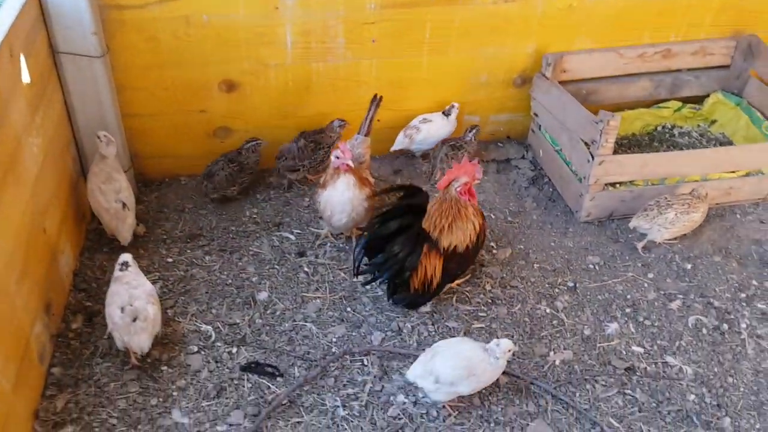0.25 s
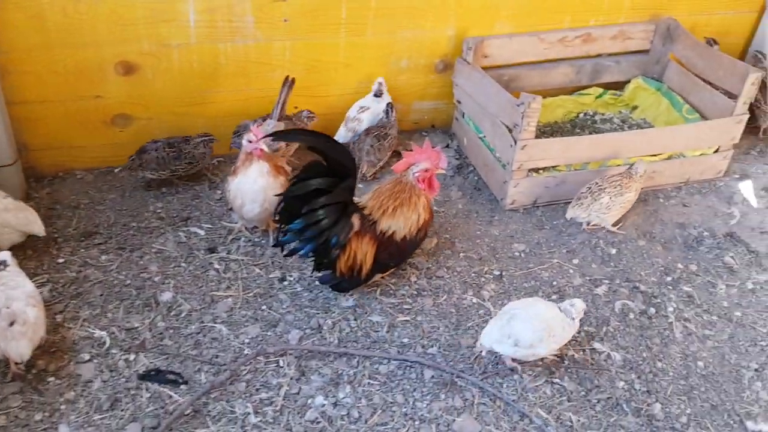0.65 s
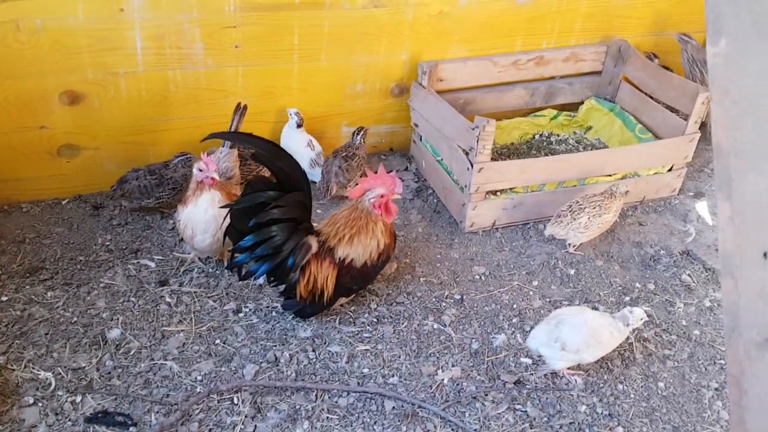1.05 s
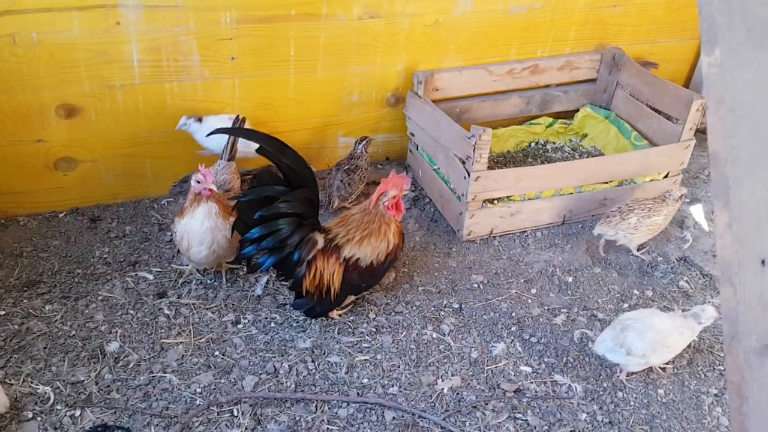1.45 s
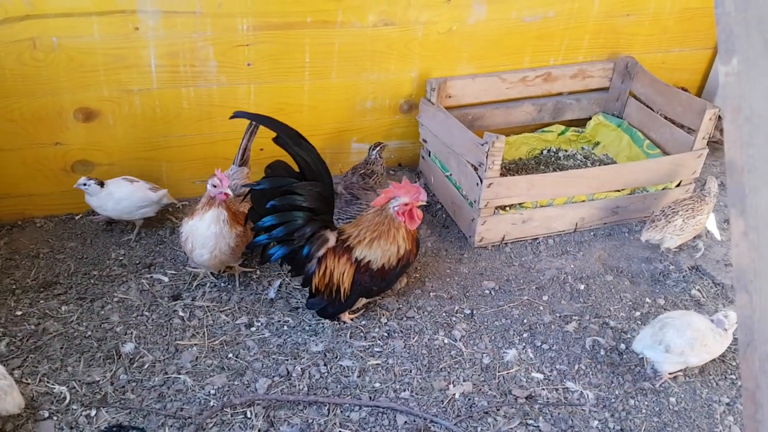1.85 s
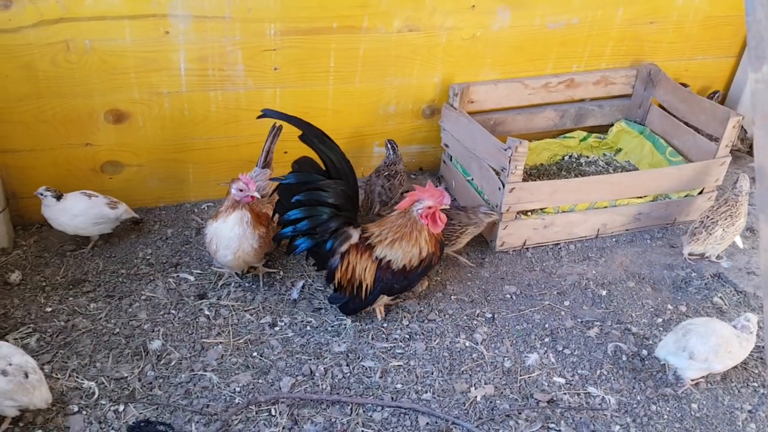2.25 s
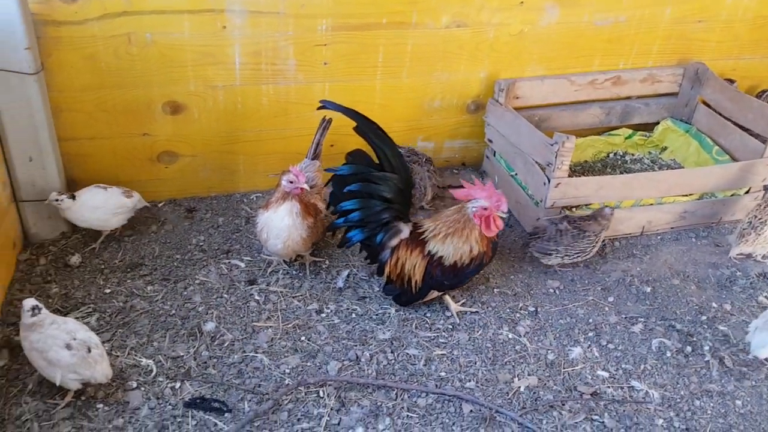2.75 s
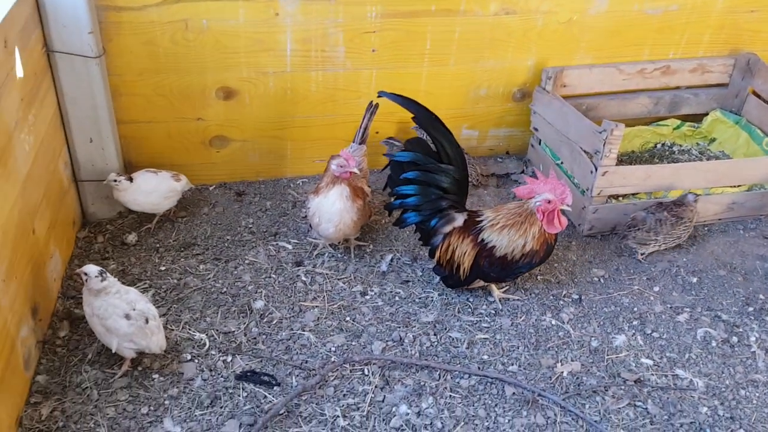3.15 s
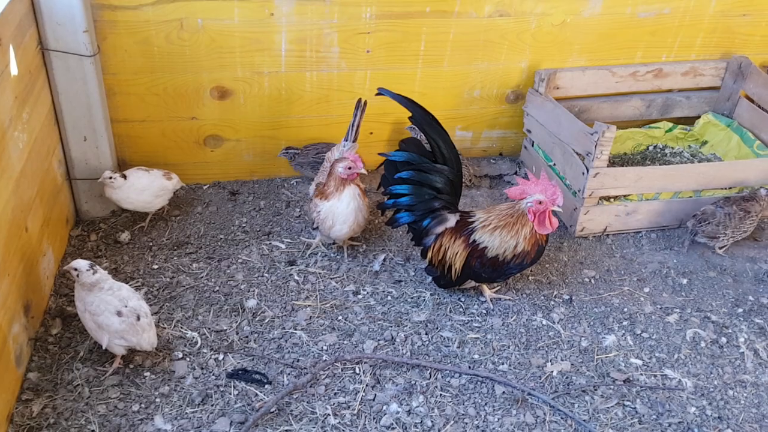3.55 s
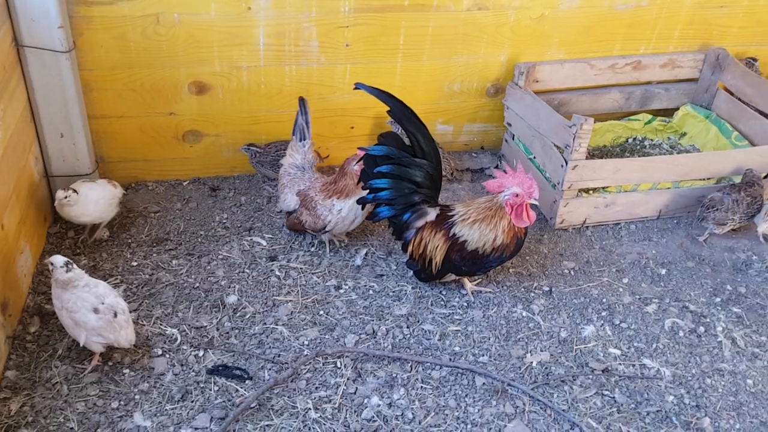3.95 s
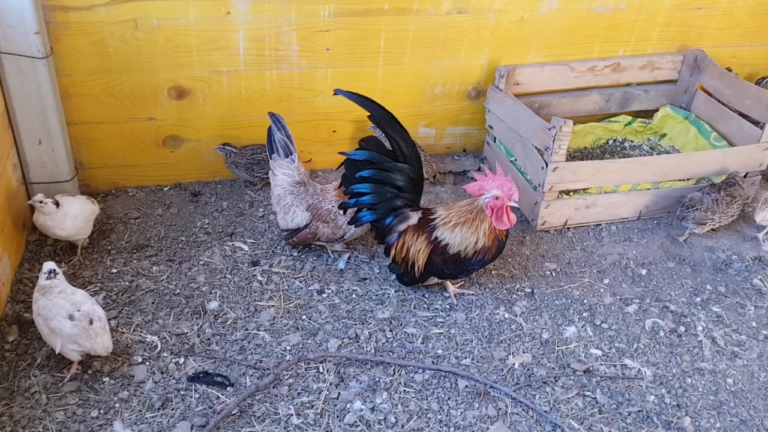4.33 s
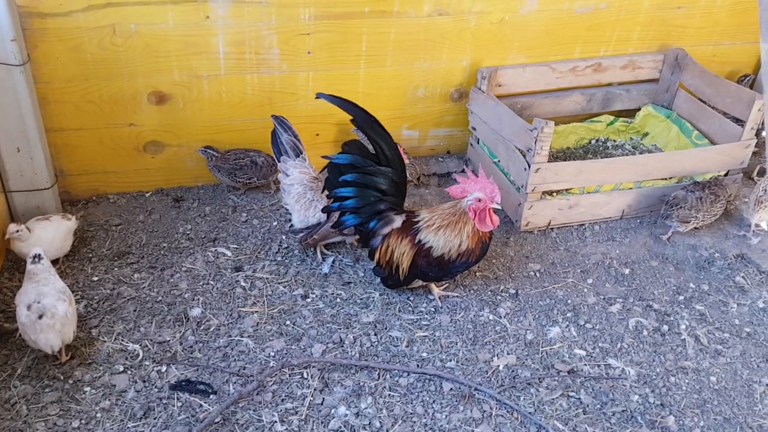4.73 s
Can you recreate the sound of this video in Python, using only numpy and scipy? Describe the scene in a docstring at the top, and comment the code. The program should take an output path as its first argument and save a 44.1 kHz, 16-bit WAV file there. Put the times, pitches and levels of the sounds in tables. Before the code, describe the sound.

A quiet outdoor hush with a very faint distant drone surrounds a small plank-walled aviary. From 0 to 1.1 s thin, fluttering, gliding chirps come from further off, while beaks and claws tick on gritty litter, most sharply near 0.9 s. At about 1.25 s wings swish in a quick flurry; until roughly 2.0 s feet scrape dully and bodies knock on wooden boards, with litter rustling and wire mesh shivering. Another brief flutter and bump comes at 2.3 s. A hen gives a short rough cluck at 2.5 s and a much fainter one at 2.8 s. Sparse ticks and weak chirps follow from 2.9 s. At 4.17 s a quail utters a short low note that cracks midway, then from 4.39 to 4.87 s a loud, harsh crow swells, trilling about twenty times a second, and stops abruptly with a short woody reverberation. Close stereo pickup.

```python
"""Thin chirps come from further off over an outdoor hush, while beaks, claws and feet tick on the litter.
From about one second birds flutter, bump the boards and scrape; then a hen clucks twice.
Near the end a quail gives a short note and then a harsh trilled crow, in a plank-walled aviary with wire mesh.
Its voice is rough pulses driving resonances and a swooping whistle; the small sounds are shaped noise and
fading tones. A close pair of microphones hears the crow with its reflections from ground and planks."""
import sys
import numpy as np
from scipy import signal
from scipy.fft import rfft, irfft
from scipy.io import wavfile
from scipy.ndimage import uniform_filter1d

SR = 44100
rng = np.random.default_rng(int(sys.argv[2]) if len(sys.argv) > 2 else 0)


def transcribe(u):
    """Save the signal u as a 16-bit wav file named by the first command-line argument.

    u: samples, shape (n,) or (channels, n), limited to [-1, 1]; the rate is SR.
    q: integer samples, one column per channel.
    """
    v = np.clip(np.atleast_2d(u).T, -1, 1)
    q = np.round(v * 32767).astype(np.int16)
    wavfile.write(sys.argv[1], SR, q)


N = 219838
TIME, BINS = np.arange(N) / SR, np.fft.rfftfreq(N, 1 / SR)  # seconds, Hz

# How alike left and right are for sounds spread over the ground.
# Each row: frequency in Hz, likeness from 0 to 1.
GROUND_LIKENESS = [(100, 0.97), (500, 0.86), (1000, 0), (2000, 0), (6000, 0), (15000, 0.3)]
# The crowing voice swoops up and back about 20 times a second.
# Each row: start in seconds, time at the crest in seconds, strength of the kick going up in dB.
VOICE_SWOOPS = [(4.417, 0.015, 12.5), (4.465, 0.019, 7), (4.517, .021, 6), (4.568, 0.0188, 9),
                (4.618, 0.01985, 4), (4.6683, 0.0174, 6), (4.715, .019, 9), (4.765, 0.0155, -7),
                (4.811, 0.012, -1), (4.848, .014, -5), (4.879, 0.012, 5)]
CROW_START_S, CROW_DB = 4.3853, -26.5  # the level is the full effort, before the voice is shaped


def amp(db):
    """Turns decibels into gain."""
    return 10 ** (np.asarray(db) / 20)


def unit(x):
    """Scales a sound to an average strength (rms) of 1."""
    return x / np.sqrt(np.mean(x ** 2) + 1e-20)


def read(points, hz):
    """Reads a table between its rows, on a log-frequency axis."""
    f, value = np.transpose(points)
    return np.interp(np.log(hz + 1), np.log(f + 1), value)


def colour(x, points):
    """Makes some frequencies louder than others, by a table of (Hz, dB)."""
    size = x.shape[-1]
    gain = amp(read(points, np.fft.rfftfreq(size, 1 / SR)))
    return irfft(rfft(x) * gain, size)


def add(mix, s, sound):
    """Mixes a sound in at time s, cutting it at the end of the mix."""
    part = mix[..., round(s * SR):][..., :sound.shape[-1]]
    part += sound[..., :part.shape[-1]]


def ramp(start, length):
    """Rises evenly from 0 to 1."""
    return np.clip((TIME - start) / length, 0, 1)


def wander(hz):
    """A random drift of rms 1 that changes at rates up to about the given one."""
    smooth = np.exp(-(BINS / hz) ** 2)
    return unit(irfft(rfft(rng.standard_normal(N)) * smooth, N))


def resonate(x, hz, width):
    """A steep two-stage resonance of gain 1 whose pitch can follow a curve."""
    turn = np.exp(2j * np.pi * np.cumsum(hz * np.ones(len(x))) / SR)
    r = np.exp(-np.pi * width / SR)
    # shift the pitch down to zero, smooth twice, and shift it back up
    smoothed = signal.lfilter([(1 - r) ** 2], [1, -2 * r, r * r], x / turn + 1e-18)
    return 2 * (turn * smoothed).real


def pair(x, likeness):
    """Blends two unrelated signals into a left and a right of given likeness."""
    a, b = rfft(x)
    same = np.clip(read(likeness, BINS), -1, 1)
    return irfft(np.array([a, same * a + np.sqrt(1 - same ** 2) * b]), N)


def steadied(x, size):
    """Holds a vibration at even strength over the given number of samples."""
    power = uniform_filter1d(uniform_filter1d(x ** 2, size), size)
    return x / np.sqrt(abs(power) + 1e-12)


def syrinx(hz, rough, jitter):
    """A bird's voice organ: uneven pulses mixed with puffs of air, one of each a cycle."""
    turns = np.cumsum(hz * (1 + jitter * rough * wander(300))) / SR
    pulses = np.diff(np.floor(turns), prepend=0)
    puffs = np.exp(-(turns % 1) / 0.23) * rng.standard_normal(N)
    rough = np.clip(rough, 0, 1)
    return (1 - rough) * unit(pulses - pulses.mean()) + rough * unit(puffs)


def air(drone_hz=1160, drone_width_hz=53, drone_db=-79, hush_db=-62.5):
    """A quiet, slightly uneven outdoor hush of coloured noise, with a faint far drone."""
    # Spectrum of the hush. Each row: frequency in Hz, relative level in dB.
    hush_colour = [(20, -33), (45, -10), (75, -5), (160, -11.5), (260, -8.5), (340, -3.5), (450, -2.5),
                   (700, -9.5), (1100, -12.5), (2400, -14.5), (7200, -27.5), (9200, -32.5), (11500, -27.5),
                   (15800, -25)]
    # How alike its left and right are. Each row: frequency in Hz, likeness from -1 to 1.
    hush_likeness = [(60, 0.74), (130, 0.88), (290, 0.71), (640, 0.27), (1400, -0.34), (3100, -0.069),
                     (15000, -0.0087)]
    noise = pair(rng.standard_normal((2, N)), hush_likeness)
    hush = unit(colour(noise, hush_colour)) * amp(hush_db + 1.8 * wander(0.98))
    hush = hush * amp([[-.7], [.7]])  # a little stronger on the right
    drone = unit(resonate(rng.standard_normal(N), drone_hz, drone_width_hz))
    return hush + amp(drone_db) * drone


def chirps(level_db=-3, waver=0.014, flutter_db=3, length_s=0.051, arch_octaves=.06):
    """Thin, fluttering whistles of small birds, each a slightly arched glide."""
    # Each row: start in seconds, level in dB before the shared trim and flutter,
    # pitch in Hz at the middle before the waver, glide in octaves.
    chirp_rows = [(.025, -69, 3900, -.3), (.062, -62.5, 2660, -0.54), (0.201, -67, 4350, 0.64),
                  (.325, -60.5, 2350, -0.84), (.353, -65, 4120, -.7), (0.426, -60.5, 3210, 0.48),
                  (0.48, -57, 2980, -0.67), (.515, -68, 2096, -.2), (.756, -59, 3500, 0.51),
                  (.78, -65, 3735, -0.42), (.81, -62, 3280, -0.73), (.903, -59, 4020, .35),
                  (1.036, -60, 4040, -0.9), (2.972, -65, 3180, -0.26), (3.058, -69, 3900, -0.99),
                  (3.142, -70, 3760, -0.81), (3.27, -66, 2760, -0.24)]
    out, shake = np.zeros(N), wander(370)
    u = np.linspace(-1, 1, int(length_s * SR))  # from start to end of a chirp
    for s, db, middle_hz, glide in chirp_rows:
        octaves = glide * u / 2 - arch_octaves * u ** 2
        hz = middle_hz * 2 ** octaves * (1 + waver * shake[int(s * SR):][:len(u)])
        whistle = np.sin(2 * np.pi * np.cumsum(hz) / SR)
        add(out, s, amp(db + level_db) * np.cos(np.pi * u / 2) * whistle)
    return out * amp(flutter_db * wander(150))


def grit(size, grain_db):
    """Two channels of tiny collisions of very uneven strength."""
    strength = np.minimum(rng.exponential(1, size // 8 + 1), 4).repeat(8)[:size]
    return unit(rng.standard_normal((2, size)) * amp(grain_db * strength))


def shower(rise_s, decay_s, low_db, treble_db, bright_db=0):
    """One short shower of grit and feather noise; a brighter one has less weight and more fizz."""
    # Basic colour of the shower. Each row: frequency in Hz, level in dB.
    scuff_colour = [(100, -40), (400, -3.5), (1300, 0.5), (4000, 2), (7000, -3), (9000, -5), (13000, 0),
                    (16000, -11)]
    t = np.arange(SR // 5) / SR
    stroke = (1 - np.exp(-t / rise_s)) * np.exp(-(t / decay_s) ** 0.88)
    tone = [(700, low_db - bright_db), (1700, 0.0091), (7000, 0), (10000, treble_db + bright_db)]
    noise = unit(colour(grit(len(t), grain_db=3.0), scuff_colour))
    return colour(noise, tone) * stroke / stroke.max()


def pattering(per_s=7, level_db=-61, spread_db=7.0):
    """Small feet keep ticking faintly on the grit, at random moments."""
    out = np.zeros((2, N))
    for s in TIME[rng.random(N) < per_s / SR]:
        tick = shower(rise_s=0.0007, decay_s=0.0032, low_db=-6, treble_db=-8)
        add(out, s, amp(level_db + spread_db * rng.uniform(-1, 1)) * tick)
    return pair(out, GROUND_LIKENESS)


def scratches(wing_db=-7.0, scrape_db=-8.5, peck_db=-4.5, clump_db=2.5):
    """Beaks and claws tick, wings swish brightly and feet scrape dully, all in uneven clumps."""
    # Beaks and claws on grit, strokes of wings, and feet scraping through the litter.
    # Each row: start in seconds, level in dB before the trim of its kind, brightness in dB.
    peck_rows = [(0.129, -55.5, -22.5), (0.3184, -49, -7), (.502, -54.5, -8), (0.6895, -47.5, 13),
                 (.7806, -43.5, 1), (0.9087, -50, 0), (0.9144, -35.5, 6.5), (1.0336, -45, 7.5),
                 (1.103, -46.5, -5), (1.205, -48.5, 12), (2.9293, -50, 12), (3.25, -54.5, 17),
                 (3.331, -51.5, -10), (3.503, -50, -14.5), (3.5666, -49.5, -9.5), (3.997, -58, 18),
                 (4.029, -53, 7)]
    wing_rows = [(1.254, -37.5, -1), (1.264, -32, 0), (1.282, -26, 0.5), (1.291, -32, -4), (1.311, -27, 2),
                 (1.3172, -34.5, -2), (1.422, -36, 2), (1.433, -31.5, -6), (2.31, -37, 2.5)]
    scrape_rows = [(1.312, -31.5, -2), (1.367, -36, -4.5), (1.399, -37.5, 0.5), (1.477, -37, 4),
                   (1.506, -43, 8), (1.6074, -38, 5), (1.6713, -47, -1), (1.841, -42, 3), (1.917, -36.5, 2),
                   (2.33, -44, -3.5)]
    out = np.zeros((2, N))
    for s, db, bright in peck_rows:
        tick = shower(rise_s=0.00045, decay_s=0.0021, low_db=1, treble_db=-12.5, bright_db=bright)
        add(out, s, amp(db + peck_db) * tick)
    for s, db, bright in wing_rows:
        swish = shower(rise_s=0.0036, decay_s=0.009, low_db=-8.5, treble_db=-9.5, bright_db=bright)
        add(out, s, amp(db + wing_db) * swish)
    for s, db, bright in scrape_rows:
        scrape = shower(rise_s=0.0017, decay_s=.013, low_db=14.5, treble_db=-20, bright_db=bright)
        add(out, s, amp(db + scrape_db) * scrape)
    return pair(out, GROUND_LIKENESS) * amp(clump_db * wander(136))


def bumps(knock_db=-9, knock_s=0.0086, soft_cycles=0.37):
    """Each blow gives a dull knock at the spot that is struck, softer when low, and the planks ring on."""
    # Feet and bodies on wood.
    # Each row: start in seconds, level in dB, pitch in Hz, time to fade by 60 dB in seconds.
    bump_rows = [(1.104, -52, 369, .09), (1.309, -29.5, 720, 0.033), (1.3942, -27.5, 738, 0.036),
                 (1.452, -25.5, 380, 0.035), (1.600, -27, 417, 0.031), (1.617, -34.5, 186, 0.18),
                 (1.845, -37, 214, 0.18), (1.858, -46, 603, 0.16), (1.921, -38, 920, 0.029),
                 (2.029, -37.5, 480, 0.098), (2.348, -37.5, 462, 0.026)]
    # The plank wall that every bump shakes.
    # Each row: frequency in Hz, level in dB against the bump, time to fade by 60 dB in seconds.
    plank_rows = [(123, -41, 0.29), (188, -31.5, 0.4), (300, -18, 0.097), (400, -40, 0.27),
                  (555, -18.5, 0.082), (1260, -26, 0.062)]
    # Heavy landings sway the whole wall; columns as for the bumps.
    sway_rows = [(1.395, -63, 46, 0.33), (1.613, -50.5, 48.5, 0.69)]
    out, t = np.zeros(N), np.arange(SR // 2) / SR
    for s, db, hz, t60 in bump_rows:
        spot = np.sin(2 * np.pi * hz * t) * amp(-60 * t / t60)
        wall = np.zeros(len(t))
        for f, level, ring in plank_rows:
            wall += amp(level - 60 * t / ring) * np.sin(2 * np.pi * (f * t + rng.random()))
        knock = unit(resonate(rng.standard_normal(len(t)), 1.52 * hz, 1.5 * hz))
        knock *= amp(knock_db) * np.exp(-t / knock_s)
        soft_start = 1 - np.exp(-t * hz / soft_cycles)
        add(out, s, amp(db) * (spot + wall + knock) * soft_start)
    for s, db, hz, t60 in sway_rows:
        add(out, s, amp(db - 60 * t / t60) * np.sin(2 * np.pi * hz * t))
    return out


def stirring(mesh_hz=2470, mesh_width_hz=360, rise_db_per_s=222):
    """Litter shifts under the birds while the wire mesh shivers; both build up with each bout and then settle."""
    # Bouts of trampling. Each row: time of the height in seconds, litter level in dB,
    # mesh level in dB, fade in dB per second.
    bout_rows = [(1.32, -57.5, -53, 88), (1.47, -50.5, -56, 70), (1.64, -52.5, -63, 39),
                 (1.859, -47, -57.5, 45), (1.979, -47.5, -51, 111), (2.35, -52, -85, 220)]
    # Colour of the litter. Each row: frequency in Hz, relative level in dB.
    litter_colour = [(60, -16), (140, -14.5), (200, -1.5), (300, -5), (500, -6.5), (1000, -9.5),
                     (2400, -18), (5000, -26.5), (9000, -42), (15000, -35)]
    s, litter_db, mesh_db, fade = np.transpose(bout_rows)[:, :, None]
    away_db = np.maximum((s - TIME) * rise_db_per_s, (TIME - s) * fade)
    # the strongest bout of the moment sets the level
    litter = unit(colour(grit(N, grain_db=2), litter_colour))
    litter *= amp((litter_db - away_db).max(0) + 2 * wander(41))
    noise = rng.standard_normal((2, N))
    mesh = np.array([unit(resonate(side, mesh_hz, mesh_width_hz)) for side in noise])
    mesh *= amp((mesh_db - away_db).max(0) + 2 * wander(70))
    return pair(litter + mesh, GROUND_LIKENESS)


def hen():
    """A cluck is a brief burst of rough pulses through a wide throat."""
    # Each row: start in seconds, level in dB, pitch in Hz, rise in seconds, decay in seconds.
    cluck_rows = [(2.507, -36, 418.6, 0.0079, 0.012), (2.787, -58, 498.5, 0.017, 0.017)]
    # Colour of the hen's throat. Each row: frequency in Hz, relative level in dB.
    hen_colour = [(120, -14.5), (330, -14.5), (480, -0.5), (760, -1), (1150, -2), (1500, -12), (2100, -12),
                  (2800, -16.5), (3600, -40), (6000, -47), (12000, -78)]
    out = np.zeros(N)
    for s, db, hz, rise, decay in cluck_rows:
        voice = steadied(colour(syrinx(hz, rough=.7, jitter=.4), hen_colour), size=300)
        t = np.maximum(TIME - s, 0)
        fade = np.exp(-np.maximum(t - rise - .011, 0) / decay)  # held 11 ms before it fades
        out += amp(db) * voice * np.minimum(t / rise, 1) * fade
    return out


def short_note(closed_db=-9, open_db=8, whistle_db=3, whistle_width_hz=700, edge_s=0.011):
    """Almost clean pulses through a nearly closed beak; where the voice cracks it roughens and a whistle leaps up."""
    # Resonances of the throat. Each row: frequency in Hz, width in Hz, level in dB.
    note_rows = [(392, 120, -5), (754, 110, -5), (1094, 440, 9), (1860, 390, -3), (2780, 240, -40),
                 (3420, 280, -25)]
    start_s, rise_s, fall_s, end_s = 4.166, .038, 0.0396, 4.29
    note_db, fade_db, note_hz, sag_hz, note_rough = -37, 20.5, 401.3, 84.2, 0.31
    crack_s, crack_width_s, crack_hz, crack_rough = 4.232, 0.01, 2540, 0.41
    crack_db, crack_dip_db = 12, 12.5  # lift of the upper resonances, dip of the whole note
    # strength fades in and out and takes the pitch with it
    strength = ramp(start_s, rise_s) - ramp(end_s - fall_s, fall_s)
    crack = np.exp(-np.square(((TIME - crack_s) / crack_width_s) ** 2))
    drive = syrinx(note_hz - sag_hz * (1 - strength), note_rough + crack_rough * crack, jitter=0.14)
    upper_db = closed_db + open_db * strength + crack_db * crack
    voice = np.zeros(N)
    for f, width, level in note_rows:
        voice += amp(level + upper_db * (f > 1600)) * resonate(drive, f, width)
    whistle_hz = crack_hz * (1 + crack) / 2
    whistle = amp(whistle_db) * crack * resonate(drive, whistle_hz, whistle_width_hz)
    gate = ramp(start_s, edge_s) - ramp(end_s - edge_s, edge_s)
    level_db = note_db - fade_db * (1 - strength) - crack_dip_db * crack
    return steadied(voice + whistle, size=300) * amp(level_db) * gate


def breath(swell_db=22, swell_s=0.072, attack_s=0.0072):
    """The crow swells quickly, holds, winds down as the breath runs out and is cut off; gives effort and wane."""
    wane_start_s, wane_s, wane_db = 4.772, 0.086, 4.5
    stop_s, release_db_per_s = 4.873, 540
    age, wane = np.maximum(TIME - CROW_START_S, 0), ramp(wane_start_s, wane_s)
    attack_db = 20 * np.log10(1 - np.exp(-age / attack_s) + 1e-6)
    rise_db = attack_db - swell_db * np.exp(-age / swell_s)
    release_db = release_db_per_s * np.maximum(TIME - stop_s, 0)
    return CROW_DB + rise_db - wane_db * wane - release_db, wane


def trill(wane, rise_s=0.0021, fall_s=0.0033):
    """Height within each swoop (0-1) and whistle pitch; the trough climbs, then closes in on the crest."""
    trough_start_hz, trough_open_hz, trough_end_hz, opening_s = 910, 1580, 2956, 0.26
    crest_start_hz, crest_end_hz = 4133, 3700
    lift = np.zeros(N)
    for s, held, _ in VOICE_SWOOPS:
        going_up = 1 + np.tanh((TIME - s) / rise_s / 2)
        coming_down = 1 - np.tanh((TIME - s - held) / fall_s / 2)
        lift += going_up * coming_down / 4
    trough = trough_start_hz + (trough_open_hz - trough_start_hz) * ramp(CROW_START_S, opening_s)
    trough = trough + (trough_end_hz - trough_open_hz) * wane
    crest = crest_start_hz + (crest_end_hz - crest_start_hz) * wane ** 2
    return lift, trough + lift * (crest - trough)


def kicks(wane, kick_s=0.0044, down_db=3.0, surge_db=4.0, surge_lag_s=0.0096, surge_s=0.0098):
    """The air is held for an instant and bursts out at each turn of a swoop; the last swoops end in a surge."""
    up, held, up_db = np.transpose(VOICE_SWOOPS)
    down = up + held
    ages = (TIME - np.r_[up, down][:, None] + 0.0022) / kick_s
    shape = np.exp(-ages ** 2) * (0.47 + 0.6 * np.tanh(4 * ages))  # a small dip, then a burst
    kick_db = np.r_[up_db, np.full(len(down), down_db)] @ shape
    surges = np.exp(-((TIME - down[:, None] - surge_lag_s) / surge_s) ** 2).sum(0)
    return kick_db + surge_db * surges * wane ** .3


def quail(whistle_width_hz=540, crest_db=-4, rasp_db=-22.5, rasp_lift_db=6, overtone_db=-22, voice_db=-1,
          shake=0.021):
    """Rough pulses drive an unsteady whistle that swoops up and down, and the fixed throat under it."""
    # Pulses of the syrinx. Each row: time in seconds, pulse rate in Hz before jitter, roughness from 0 to 1.
    pulse_rows = [(4.39, 391.6, .4), (4.46, 450.2, .52), (4.599, 450, .65), (4.74, 400, .6),
                  (4.785, 348.7, 0.38), (4.82, 427.6, .35), (4.918, 390.5, 0.7)]
    # Fixed resonances of the throat.
    # Each row: frequency in Hz, width in Hz, level in dB, extra dB when the voice is soft.
    throat_rows = [(430, 120, -27, 19), (1150, 330, -7, 3), (2000, 700, -14, -7), (2950, 600, -16, -12)]
    # Colour of the whistle as it leaves the beak. Each row: frequency in Hz, level in dB.
    beak_colour = [(300, -55), (600, -8), (1100, 3), (1700, 8), (2400, 7.5), (3000, 3.5), (3500, -1.5),
                   (4200, 2.5), (5000, 11.5), (6500, 7), (9000, -36)]
    # Colour of the loud voice's rasp. Each row: frequency in Hz, relative level in dB.
    rasp_colour = [(300, -14), (900, 12.5), (3000, -53), (5500, 9.5), (7300, -1.5), (8800, -12),
                   (10500, -9.5), (13000, -7), (16000, -21)]
    # The small body radiates little bass. Each row: frequency in Hz, level in dB.
    body_colour = [(60, -19), (250, -11.5), (450, -7.5), (800, 1), (15000, 0.5)]
    effort_db, wane = breath()
    lift, whistle_hz = trill(wane)
    whistle_hz = whistle_hz * (1 + shake * wander(210))
    s, pulse_hz, rough = np.transpose(pulse_rows)
    drive = syrinx(np.interp(TIME, s, pulse_hz), np.interp(TIME, s, rough), jitter=.25)
    # a soft voice loses the top of each swoop, its overtones and its rasp
    soft = np.clip((CROW_DB - effort_db) / 20, 0, 1)
    whistle = steadied(resonate(drive, whistle_hz, whistle_width_hz), size=260)
    whistle = colour(whistle * amp(lift * (crest_db - 15.3 * soft)), beak_colour)
    overtone = steadied(resonate(drive, 2 * whistle_hz, 2 * whistle_width_hz), size=260)
    overtone *= amp(overtone_db - 66 * lift - 39 * soft)
    throat = np.zeros(N)
    for hz, width, db, extra in throat_rows:
        throat += amp(db + soft * (extra - 1.4 * lift)) * steadied(resonate(drive, hz, width), size=900)
    rasp = unit(colour(drive, rasp_colour))
    rasp *= amp(rasp_db + rasp_lift_db * lift - 20 * soft + 2 * wander(280))
    level_db = effort_db + voice_db + kicks(wane) + 1.28 * wander(370)
    return colour((whistle + overtone + throat + rasp) * amp(level_db), body_colour)


def reflected(x):
    """Sound reaches the two microphones by several paths, each at slightly different times."""
    # Paths from the quail to the microphones.
    # Each row: delay in milliseconds, signed gain, lag of left behind right in milliseconds.
    path_rows = [(0.0, 0.67, 0.32), (0.174, 0.33, 0.12), (0.286, 0.27, 0.081), (0.302, -0.53, -0.31),
                 (0.758, -0.43, 0.02), (1.228, -0.36, -0.4), (1.89, 0.41, 0.25), (2.778, 0.33, -0.16),
                 (2.797, -0.36, 0.1), (3.955, -0.35, 0.15), (5.687, -0.45, -0.36)]
    sides = np.array([[.5], [-.5]])
    paths = 0
    for ms, gain, lag in path_rows:
        paths = paths + gain * np.exp(-2j * np.pi * BINS * (ms + sides * lag) / 1000)
    return irfft(rfft(x) * paths, N)


def aviary(x, early_db, tail_db, early_s):
    """Dense scatter from the planks, then a weak tail that dies band by band."""
    # Decay of the aviary, longest near 2000 and 3600 Hz and short in the bass.
    # Each row: frequency in Hz, time to fade by 60 dB in seconds.
    decay_rows = [(100, 0.16), (500, 0.27), (1200, 0.28), (2000, 0.49), (2700, 0.32), (3600, 0.47),
                  (6000, 0.4), (15000, 0.31)]
    taps = rng.choice([-1., 1.], (2, SR)) * (rng.random((2, SR)) < 3000 / SR)  # about 3000 echoes a second
    age = np.arange(SR) / SR
    early = taps * (age > .003) * np.exp(-age / early_s)
    hz, t, z = signal.stft(taps[::-1] * (age > .012), SR, nperseg=256)
    fading = z * amp(-60 * t / read(decay_rows, hz)[:, None])
    tail = signal.istft(fading, SR, nperseg=256)[1][:, :SR]
    response = (amp(early_db) * unit(early) + amp(tail_db) * unit(tail)) / np.sqrt(SR)
    return signal.fftconvolve(np.atleast_2d(x), response, axes=1)[:, :N]


def scene():
    """The background, the other birds and the crow, all but the hush and the stirring echoed by the aviary."""
    far = chirps()
    far_room = aviary(far, early_db=0.0, tail_db=-19, early_s=0.007)
    ground = scratches() + pattering() + bumps() + hen()
    ground = ground * amp([[-1], [1]])  # the busy birds are a little to the right
    ground_room = aviary(ground, early_db=-6.5, tail_db=-13.5, early_s=0.0091)
    voice = short_note() + quail()
    crow = reflected(voice) + aviary(voice, early_db=-2, tail_db=-17.5, early_s=0.012)
    return air() + far + far_room + ground + ground_room + stirring() + crow


def record(dry):
    """The recorder's band limit: a steep filter that removes the highest treble."""
    edge_hz = 15850
    lowpass = signal.firwin(511, edge_hz, window=("kaiser", 9), fs=SR)
    return signal.oaconvolve(dry, lowpass[None], "same")


dry = scene()
out = record(dry)
transcribe(out)
```